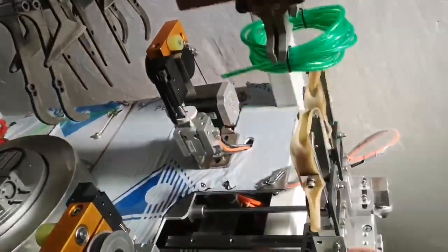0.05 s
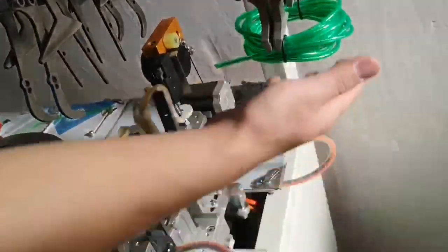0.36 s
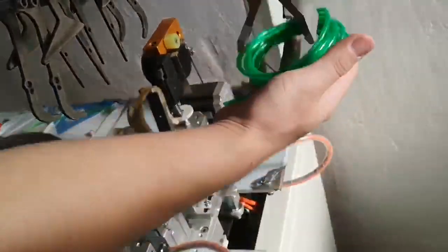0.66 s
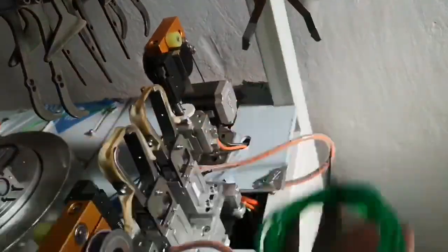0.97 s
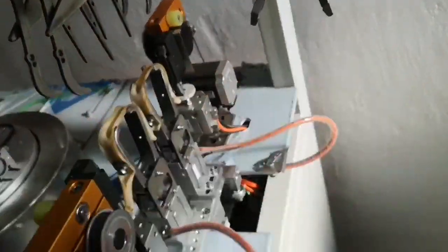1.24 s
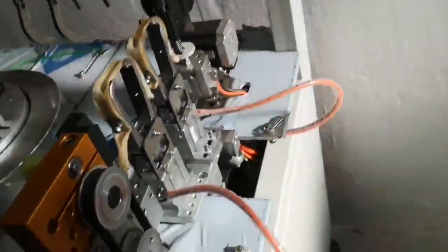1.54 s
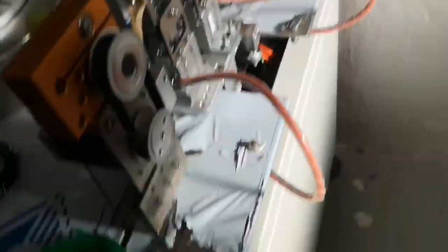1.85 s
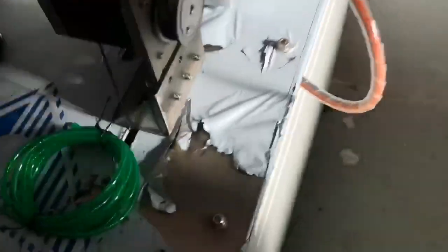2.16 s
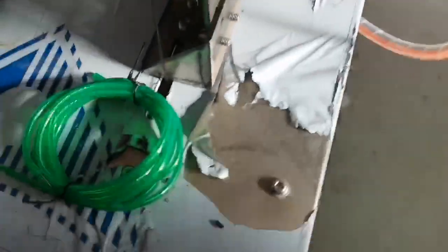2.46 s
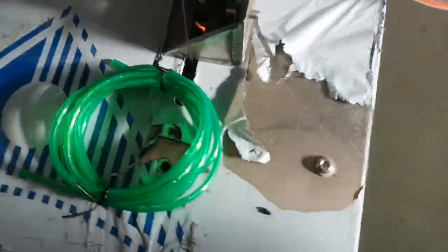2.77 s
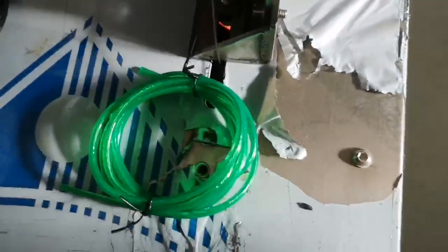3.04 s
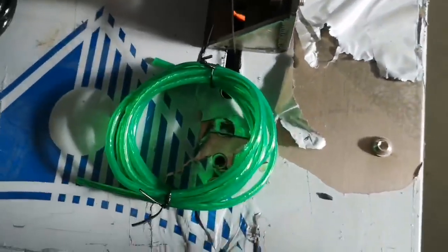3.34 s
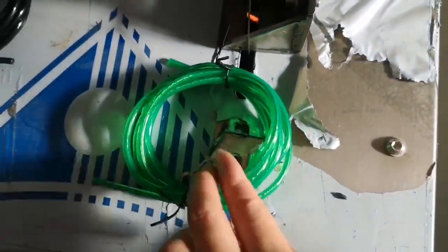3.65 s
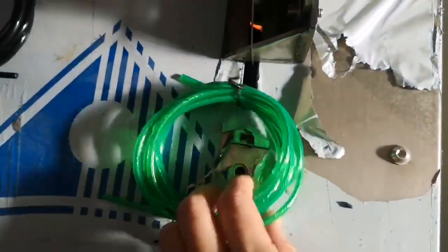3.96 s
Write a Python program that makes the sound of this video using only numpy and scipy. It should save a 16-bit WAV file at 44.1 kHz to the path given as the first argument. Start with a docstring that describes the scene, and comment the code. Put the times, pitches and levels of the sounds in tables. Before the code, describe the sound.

A pneumatic wire tying machine ends its cycle with loud air blasts, thuds and ringing steel clacks. A plastic coil then drops lightly on the table and is softly brushed, while motors hum close by in a small workshop.

```python
"""Idling motors rumble and hum in a small workshop as a pneumatic wire winding and tying machine ends
its cycle. Air vents from the cylinders; from 0.1 s valves blast, the frame thuds, steel parts ring and
slides clack against their stops. A guide rod sings, the table shudders, and at 0.8 s the gripper opens.
At 1.7 s a hand drops the plastic coil on the table, then brushes about.
From 3.3 s a drive whistles faintly, twice."""
import sys
import numpy as np
from scipy import signal
from scipy.fft import rfft, irfft
from scipy.io import wavfile
from scipy.ndimage import uniform_filter1d

SR = 44100
rng = np.random.default_rng(int(sys.argv[2]) if len(sys.argv) > 2 else 0)


def put_to_file(sound):
    """Save the sound as 16-bit audio at rate SR, in the file named by the first command-line argument."""
    columns = np.atleast_2d(sound).T  # one column per channel
    safe = np.clip(columns, -1, 1)
    whole_steps = np.round(safe * 32767)
    wavfile.write(sys.argv[1], SR, whole_steps.astype(np.int16))


N = 176400
TIME_S = np.arange(N) / SR
BINS_HZ = np.arange(N // 2 + 1) * SR / N


def undb(db):
    """Decibels to gain."""
    return 10 ** (np.asarray(db) / 20)


def unit(x):
    """Scale to rms 1."""
    return x / np.sqrt(np.mean(x ** 2))


def pan(db):
    """Stereo gains for a left-right level difference."""
    return undb(np.array([[db], [-db]]) / 2)


def curve(points):
    """A (frequency [Hz], level [dB]) table read at every bin."""
    hz, db = np.array(points, float).T
    return np.interp(np.log(BINS_HZ + 1), np.log(hz), db)


def noise(spectrum, correlation=0.064):
    """Coloured stereo noise, rms 1."""
    mid, side = rng.standard_normal((2, N))
    pair = mid * np.sqrt(1 + correlation) + side * np.sqrt(1 - correlation) * np.array([[1], [-1]])
    return unit(irfft(rfft(pair) * undb(curve(spectrum)), N))


def tilt(x, db_per_oct):
    """Slope the spectrum above 1 kHz; rms 1."""
    octaves = np.log2(np.maximum(BINS_HZ, 1000) / 1000)
    return unit(irfft(rfft(x) * undb(db_per_oct * octaves), N))


def walk(rate_hz):
    """Smooth random drift, rms 1."""
    step = max(int(SR / rate_hz), 2)
    stairs = np.repeat(rng.standard_normal(N // step + 1), step)
    return unit(uniform_filter1d(stairs, step)[:N])


def envelope(start_s, attack_s, hold_s, t60_s):
    """Linear rise, hold, exponential fall."""
    t = np.maximum(TIME_S - start_s, 0)
    return np.minimum(t / attack_s, 1) * undb(-60 * np.maximum(t - attack_s - hold_s, 0) / t60_s)


def ring(start_s, modes, attack_s, spread_rad, rattle):
    """Struck modes waver as loose parts rattle; spread_rad parts the left and right phases."""
    t, out = TIME_S[:SR], np.zeros((2, N + SR))
    onset = int(start_s * SR)
    for hz, db, t60_s in modes:
        phase = rng.uniform(0, 2 * np.pi) + spread_rad * rng.uniform(-0.94, 1) * np.array([[1], [-1]])
        knots = rng.standard_normal(60) + 1j * rng.standard_normal(60)
        waver = (1 + rattle * np.interp(t, np.linspace(0, 1, 60), knots)) / np.hypot(1, rattle)
        tone = np.imag(waver * np.exp(1j * (2 * np.pi * hz * t + phase)))
        out[:, onset:onset + SR] += undb(db - 60 * t / t60_s) * tone * np.minimum(t / attack_s, 1)
    return out[:, :N]


def room(x, t60_s=0.57, build_s=0.0015):
    """Dense reflections from table, machine and walls."""
    t = TIME_S[:SR // 2]
    tail = rng.standard_normal((2, len(t))) * undb(-60 * t / t60_s) * np.minimum(t / build_s, 1)
    tail /= np.sqrt(np.sum(tail ** 2) / 2)
    return signal.fftconvolve(x.mean(axis=0)[None], tail, axes=1)[:, :N]


# motor rumble (frequency [Hz], density [dB])
RUMBLE_SPECTRUM = [(8, -11), (25, -1), (38, 1), (52, 2.5), (75, -2.5), (105, -10), (135, -11), (150, -11),
                   (175, -10), (230, -12), (270, -20.5), (400, -29), (700, -64)]
# motor and mains lines (frequency [Hz], level [dB], unsteadiness [0-1])
HUM_LINES = [(27, -39, 0.3), (49, -41, .35), (172.8, -47, 0.1), (200.6, -42, 0.05)]


def motors(rumble_db=-33.5):
    """Idling motors rumble under an unsteady hum."""
    out = undb(rumble_db) * noise(RUMBLE_SPECTRUM, correlation=0.94)[0]
    for hz, db, unsteadiness in HUM_LINES:
        swing = 1 + unsteadiness * (walk(6.07) + 1j * walk(8.5))
        carrier = np.exp(2j * np.pi * (hz * TIME_S + rng.random()))
        out += undb(db) * unit(np.real(swing * carrier))
    return out


# fan noise (frequency [Hz], density [dB])
FAN_SPECTRUM = [(150, -6.5), (300, 6), (480, 5), (640, -1.5), (950, -2.5), (1170, 2), (1400, -5),
                (1750, -0.5), (2700, -5.5), (3200, -13.5), (5300, -17.5), (6400, -21.5), (7600, -20),
                (9300, -24), (11000, -40), (15000, -45)]


def fans(level_db=-48.5, flicker_db=0.12):
    """Fans rush almost steadily."""
    return undb(level_db - flicker_db * walk(13)) * noise(FAN_SPECTRUM)


def drive_whine(hz=8000, level_db=-73):
    """A drive whines, drifting in level and phase."""
    return undb(level_db + 2.2 * walk(4.07)) * unit(np.sin(2 * np.pi * hz * TIME_S + 0.5 * walk(20)))


# exhaust flow on the return stroke (time [s], level [dB])
EXHAUST_FLOW = [(0, -25.5), (.09, -23.5), (.2, -27.5), (.3, -29), (.4, -30.5), (.47, -32.5), (.54, -33),
                (.78, -41)]
# exhaust hiss (frequency [Hz], density [dB])
EXHAUST_SPECTRUM = [(300, -10.5), (600, -10.5), (1300, -9), (1750, 0.5), (2550, 0.5), (3050, -11),
                    (3700, -4), (5000, -4), (5750, -3), (6200, -8.5), (7900, -6), (9300, -10),
                    (10500, -21.5), (15000, -27.5)]


def exhaust():
    """Venting air hisses, fading as cylinder pressure falls."""
    times_s, levels_db = np.array(EXHAUST_FLOW).T
    flow = undb(np.interp(TIME_S, times_s, levels_db))
    gate = envelope(-0.88, 0.898, times_s[-1], 0.25)  # already open at 0 s
    return noise(EXHAUST_SPECTRUM) * flow * gate


# valve blasts (start [s], level [dB], attack [s], hold [s], t60 [s], tilt [dB/oct])
VALVE_BLASTS = [(0.108, -20.5, .018, .025, 0.35, 2.5), (0.536, -23.5, 0.004, 0.0094, 0.072, -3.5),
                (0.55, -19.5, 0.0082, 0.033, 0.37, -0.5), (0.787, -44, .01, 0.0073, 0.22, -3)]
# valve jet (frequency [Hz], density [dB])
JET_SPECTRUM = [(300, -6), (600, -1), (1250, -2), (1700, 3.5), (2600, 0), (3150, 0.5), (3750, 2),
                (4300, -4.5), (5700, 2), (6500, -7), (7500, 1), (9200, 0), (10500, -11), (12500, -20.5),
                (15000, -24)]


def valves():
    """Each valve lets out a blast of air as it switches."""
    jet = noise(JET_SPECTRUM)
    return sum(undb(db) * tilt(jet, db_per_oct) * envelope(start_s, attack_s, hold_s, t60_s)
               for start_s, db, attack_s, hold_s, t60_s, db_per_oct in VALVE_BLASTS)


# steel parts (frequency [Hz], level [dB], t60 [s])
STEEL_MODES = [(1630, -2.5, 0.59), (2270, -16, .35), (2516, 1, 0.37), (2640, 2, 0.22), (4570, -3, .3),
               (5160, -4, 0.33), (5800, 2, .3), (6470, 8, 0.21), (7360, 1, 0.29), (7920, -9, 0.23),
               (9000, -7, .28)]


def air_over_steel(air, width_hz=28, coupling_db=7.5, flutter_db=0.59, gain_db=-1):
    """Rushing air flutters and picks up the steel's resonances."""
    fluttering = air * undb(gain_db + flutter_db * walk(160))
    peaks = sum(undb(db + coupling_db) / 2 / (1 + 2j * (BINS_HZ - hz) / width_hz)
                for hz, db, _ in STEEL_MODES)
    return irfft(rfft(fluttering) * (1 + peaks), N)


# frame jolts (start [s], thud level [dB], steel level [dB])
JOLTS = [(.109, -22.5, -41), (.165, -26, -61), (.425, -23.5, -67), (.495, -21.5, -67), (.549, -20, -31.5),
         (.645, -25.5, -41.5)]
# machine frame (frequency [Hz], level [dB], t60 [s])
FRAME_MODES = [(78.3, 3, 0.37), (123.4, 0.5, 0.31), (175.3, -3.5, 0.38), (330, -15, 1), (508, -21.5, 0.79)]
# table thud (frequency [Hz], density [dB])
THUD_SPECTRUM = [(30, -19), (80, 1.5), (170, 2.5), (260, -6.5), (340, -9), (450, -22), (1000, -50)]


def jolts(table_db=-5, frame_db=-3.5):
    """Jolts shake table and frame and set steel parts ringing."""
    out = 0
    for start_s, thud_db, steel_db in JOLTS:
        table = noise(THUD_SPECTRUM, correlation=1) * envelope(start_s, 0.004, 0.0035, t60_s=0.71)
        frame = ring(start_s, FRAME_MODES, attack_s=0.0053, spread_rad=0.1, rattle=0.28)
        steel = ring(start_s, STEEL_MODES, attack_s=0.0058, spread_rad=1.8, rattle=1.6)
        out += undb(thud_db) * (undb(table_db) * table + undb(frame_db) * frame) + undb(steel_db) * steel
    return out


# slide stops (start [s], level [dB], ring [Hz], ring t60 [s], crack re ring [dB], left-right [dB])
CLACKS = [(.116, -18.5, 2180, 0.059, -7.5, 2.5), (0.4753, -9.5, 2730, 0.023, -10.5, 8.5),
          (.506, -17.5, 9160, .018, -7.5, -3), (.622, -18, 1680, 0.035, -6, -1),
          (.81, -34.5, 7820, 0.021, -5.5, 7)]
# impact crack (frequency [Hz], density [dB])
CRACK_SPECTRUM = [(200, -14), (1050, 1), (1800, 3.5), (4500, -3), (8000, -10.5), (15000, -36)]


def slide_clacks(width_hz=272, chatter_db=-8.5, room_db=-6):
    """A slide hits its stop: broad crack, heavily damped ring, chatter of loose parts."""
    out, burst = 0, noise(CRACK_SPECTRUM)
    rough_burst = burst * undb(chatter_db + 2 * walk(199.4))
    for start_s, db, hz, t60_s, crack_db, pan_db in CLACKS:
        modes = [(hz - width_hz / 2, 0, t60_s), (hz, -3, t60_s), (hz + width_hz, -4, t60_s)]
        ping = ring(start_s, modes, attack_s=0.00045, spread_rad=1, rattle=0.27)
        crack = undb(crack_db) * burst * envelope(start_s, 0.00073, 0.00093, t60_s=0.039)
        chatter = undb(crack_db) * rough_burst * envelope(start_s, 0.004, 0.014, t60_s=0.19)
        out += undb(db) * (pan(pan_db) * (ping + crack) + chatter)
    return out + undb(room_db) * room(out)


# guide rod (frequency [Hz], level [dB], t60 [s])
ROD_MODES = [(3752, -31, .5)]


def guide_rod(start_s=0.564):
    """A guide rod sings after the hardest jolt."""
    return ring(start_s, ROD_MODES, attack_s=0.0033, spread_rad=0.57, rattle=0.87)


def table_shudder(level_db=-29, t60_s=5.35):
    """The table keeps shaking after the last jolt."""
    shudder = noise([(25, -7), (62, 0), (110, -6.5), (250, -26), (800, -119)], correlation=1)
    return undb(level_db) * shudder * envelope(JOLTS[-1][0], 0.037, 0, t60_s)


# gripper ring (frequency [Hz], level [dB], t60 [s])
GRIPPER_MODES = [(937, 0, .6), (1017, -5, .45), (1093, -9, .5)]
# gripper buzz (frequency [Hz], density [dB])
BUZZ_SPECTRUM = [(300, -30), (740, -13), (900, -5), (1040, -9.5), (1150, -13), (1400, -23), (3000, -50)]


def gripper(start_s=0.789, ring_db=-34, buzz_db=-39):
    """The gripper opens with a buzzing ring."""
    tone = ring(start_s, GRIPPER_MODES, attack_s=0.0081, spread_rad=0.27, rattle=0.24)
    buzz = noise(BUZZ_SPECTRUM) * envelope(start_s, 0.012, 0.06, t60_s=0.6)
    return undb(ring_db) * tone + undb(buzz_db) * buzz


# coil taps (start [s], level [dB], t60 [s])
TAPS = [(1.666, -37.5, 0.06), (1.688, -27.5, 0.034), (1.737, -37, .04), (1.824, -43, 0.022),
        (1.969, -49.5, .05), (2.772, -54, .08)]
# plastic on the table (frequency [Hz], density [dB])
PLASTIC_SPECTRUM = [(400, -7), (1400, -5), (2700, 4), (3500, -2.5), (5000, 1.5), (6300, -1.5), (7600, 2.5),
                    (9400, -4.5), (10800, -14.5), (15000, -17)]


def coil_taps(room_db=-1):
    """The coil and its loose ends tap the table."""
    tick = noise(PLASTIC_SPECTRUM, correlation=0.22)
    taps = sum(undb(db) * tick * envelope(start_s, 0.00039, 0.001, t60_s) for start_s, db, t60_s in TAPS)
    return taps + undb(room_db) * room(taps)


# rubs (start [s], level [dB], attack [s], hold [s], t60 [s], left-right [dB], tilt [dB/oct])
RUBS = [(1.694, -47.5, 0.012, .12, 0.2, -3, 5), (1.935, -55.5, .025, 0.052, 0.21, 0, 7),
        (2.124, -45.5, 0.0057, 0.058, 0.26, -2.5, -2), (2.49, -57, .09, 0.14, .5, -3.5, -0.5),
        (3.046, -50.5, .1, .045, .12, 1.5, -4.5)]


def coil_rubs(grain_db=1.5):
    """Coil and hand slide over the table with a fine, uneven grain."""
    friction = noise(PLASTIC_SPECTRUM) * undb(grain_db * walk(1000) + 1.4 * walk(60))
    out = 0
    for start_s, db, attack_s, hold_s, t60_s, pan_db, db_per_oct in RUBS:
        stroke = undb(db) * envelope(start_s, attack_s, hold_s, t60_s)
        out += pan(pan_db) * tilt(friction, db_per_oct) * stroke
    return out


# drive whistles (start [s], level [dB], hold [s])
WHISTLES = [(3.33, -71.5, .08), (3.7, -75, .08)]


def drive_whistle(hz=5480):
    """The drive's faint whistle comes and goes."""
    swells = sum(undb(db) * envelope(start_s, 0.06, hold_s, 0.56) for start_s, db, hold_s in WHISTLES)
    return swells * np.sin(2 * np.pi * hz * TIME_S + walk(80))


def scene():
    """Workshop, machine and coil, in stereo."""
    workshop = motors() + fans() + drive_whine()
    air = air_over_steel(exhaust() + valves())
    mechanics = jolts() + slide_clacks() + guide_rod() + table_shudder() + gripper()
    return workshop + air + mechanics + coil_taps() + coil_rubs() + drive_whistle()


# microphone port mismatch (frequency [Hz], left-right [dB])
PORT_MISMATCH = [(1100, 0.5), (2000, -1), (3500, 1.5), (5500, 0), (7600, 6), (8400, 3.5), (9100, -12.5),
                 (10000, -0.5), (11500, -2), (15000, -2)]


def record(dry, alike_below_hz=400, cutoff_hz=15400):
    """Two microphone ports colour the treble differently; peaks are rounded, the top is cut."""
    tint_db = curve([(alike_below_hz, 0)] + list(PORT_MISMATCH)) / 2
    heard = irfft(rfft(dry) * undb([tint_db, -tint_db]), N)
    lowpass = signal.ellip(10, 0.2, 80, cutoff_hz, fs=SR, output="sos")
    return signal.sosfilt(lowpass, np.tanh(heard))


dry = scene()
out = record(dry)
put_to_file(out)
```